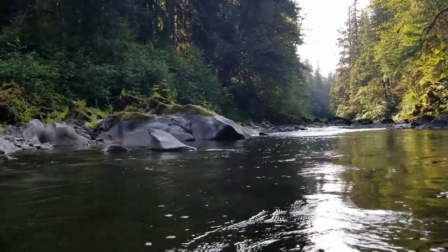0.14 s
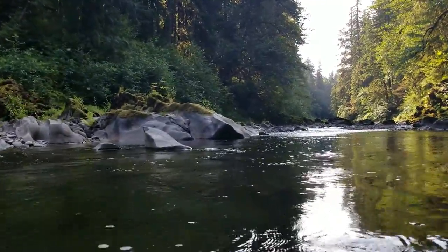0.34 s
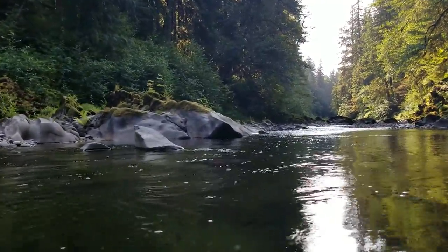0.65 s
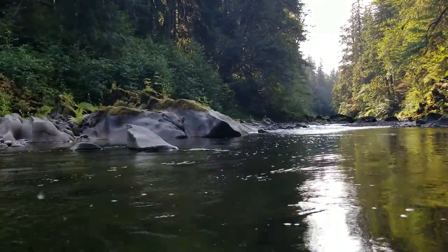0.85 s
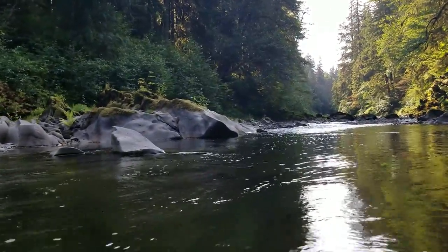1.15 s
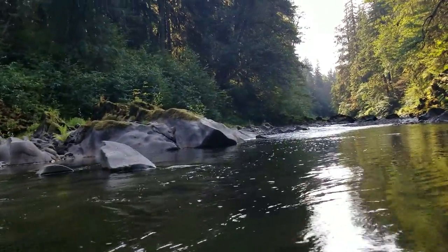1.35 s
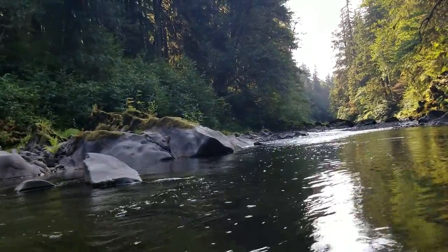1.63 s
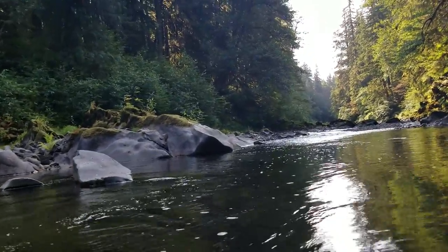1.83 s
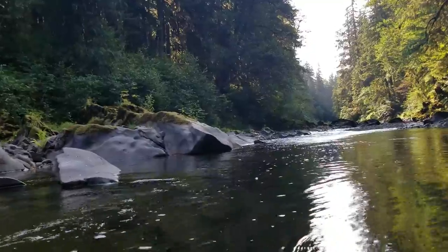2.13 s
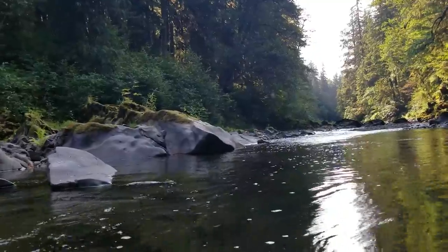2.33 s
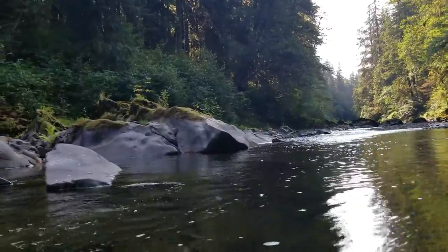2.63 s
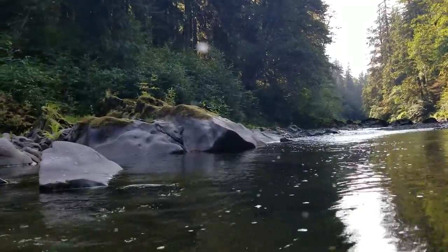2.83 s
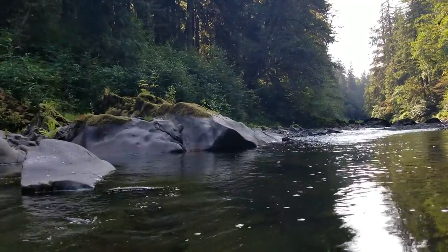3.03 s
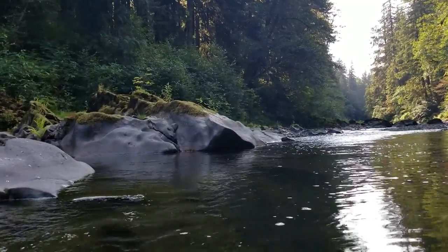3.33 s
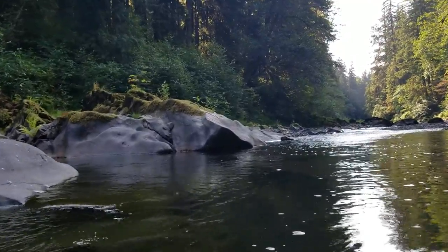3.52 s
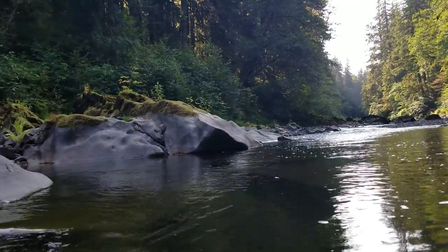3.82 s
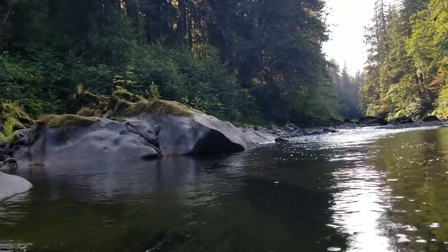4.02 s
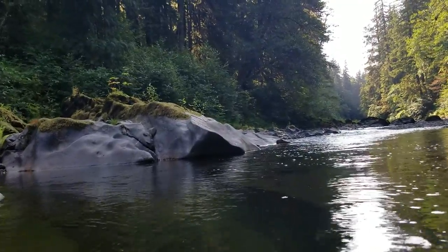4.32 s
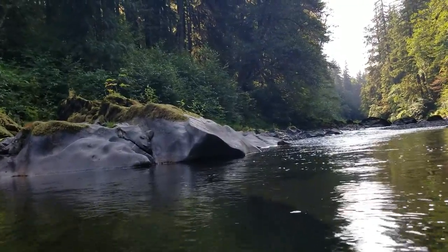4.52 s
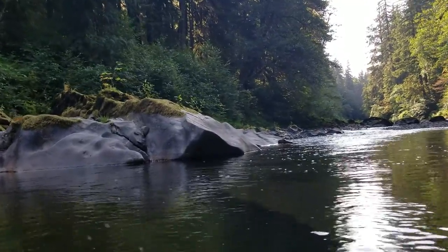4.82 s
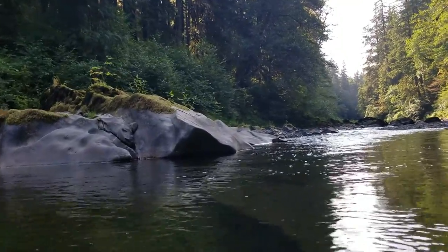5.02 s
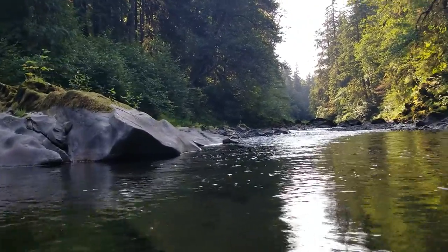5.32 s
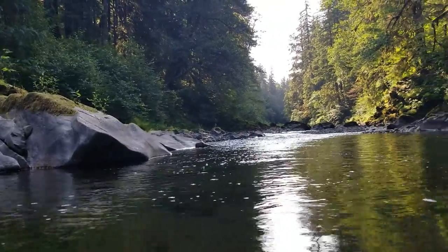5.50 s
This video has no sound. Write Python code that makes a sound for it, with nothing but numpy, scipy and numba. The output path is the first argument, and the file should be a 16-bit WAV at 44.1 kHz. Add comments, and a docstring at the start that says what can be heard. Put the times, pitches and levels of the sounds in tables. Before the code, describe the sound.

Close stereo sound from a small boat on a river: water swirls and bubbles around a paddle, and the second stroke begins with a single sharp knock on the hull. After a brief lull, the strokes carry on with light drips and spray, the last one deepest and splashiest. Far rapids hiss softly and evenly all around throughout.

```python
"""Water gurgles and swishes round a paddle while far rapids hiss on all sides.
A small boat moves along a river, one stroke a second on alternate sides. Each blade drags air
under, which rings as bubbles, and throws spray. Drops and sheets of water fall back, and the
shaft knocks the hull once. Two microphones a hand apart hear it all."""
import sys
import numpy as np
from scipy import signal
from scipy.fft import rfft, irfft, next_fast_len
from scipy.io import wavfile
from scipy.ndimage import uniform_filter1d, map_coordinates
from numba import njit

SR = 44100
rng = np.random.default_rng(int(sys.argv[2]) if len(sys.argv) > 2 else 0)


def store_pcm(level_fs):
    """Save levels as 16-bit WAV."""
    pcm = np.round(np.clip(level_fs, -1, 1) * 32767).astype(np.int16)
    wavfile.write(sys.argv[1], SR, np.atleast_2d(pcm).T)


N = 249606
TOP_HZ = 16990  # highest pitch let through
SIDES = np.array([[.5], [-.5]])  # splits a difference between left and right

# Paddle strokes; lag is how much later the left microphone hears the blade:
# start_s, first_lag_ms, last_lag_ms, extra_glug_db, extra_spray_db, left_over_right_db
STROKES = [(0, 0.05, 0.12, 3, 0.5, 1.2), (1.008, -0.36, -0.22, 0, 1.5, -1.5),
           (1.9, 0.54, 0.018, 2, 4.5, 0.5), (3.001, -0.36, -0.14, 1.5, 1, 0),
           (4.082, 0.48, 0.083, -1.5, 3, 0.5), (5.06, -.3, -0.17, 12, -8, 1)]


def amp(db):
    """Turns decibels into a gain."""
    return 10 ** (np.asarray(db) / 20)


def unit(x):
    """Scales a signal to an average power of 1."""
    return x / np.sqrt(np.mean(x ** 2) + 1e-20)


def along(points, hz):
    """Reads between (pitch_hz, value) points on a log pitch scale."""
    pitches, values = np.transpose(points)
    return np.interp(np.log(hz + 1), np.log(pitches + 1), values)


def curves(rows):
    """One value per sample for each column after the time."""
    time_s, *columns = np.transpose(rows)
    return [np.interp(np.arange(N) / SR, time_s, column) for column in columns]


def filtered(x, response):
    """Gives each pitch in x the gain response(hz)."""
    size = next_fast_len(N + 8192)
    return irfft(rfft(x, size) * response(np.fft.rfftfreq(size, 1 / SR)), size)[..., :N]


def wobble(rate):
    """A smooth curve through `rate` random values a second."""
    return map_coordinates(rng.standard_normal(int(N * rate / SR) + 4), [np.arange(N) * rate / SR])


def patchy_noise(depth_db, channels=1):
    """White noise with louder and softer patches in time and pitch."""
    grid = signal.stft(rng.standard_normal((channels, N)), nperseg=256)[2]
    patches = uniform_filter1d(rng.standard_normal(grid.shape[1:]), size=4, axis=0)
    patches = uniform_filter1d(patches, size=5, axis=1)
    return signal.istft(grid * amp(depth_db * unit(patches)), nperseg=256)[1][:, :N]


def blade_lag_ms(time_s):
    """The blade sweeps back, so its delay between the microphones slides through each stroke."""
    start_s, first_ms, last_ms = np.transpose(STROKES)[:3]
    k = np.clip(np.searchsorted(start_s, time_s, side="right") - 1, 0, None)
    progress = (time_s - start_s[k]) / np.diff(np.append(start_s, N / SR))[k]
    return first_ms[k] + np.sqrt(np.abs(progress)) * (last_ms[k] - first_ms[k])


def stroke_character():
    """Each stroke's extra glug, spray and lean to the left in dB, blended over one second."""
    start_s, *_, glug_db, spray_db, lean_db = np.transpose(STROKES)
    k = np.clip(np.searchsorted(start_s, np.arange(N) / SR) - 1, 0, None)
    return uniform_filter1d(np.array([glug_db[k], spray_db[k], lean_db[k]]), size=SR, axis=1)


@njit
def add_bubbles(out, start_s, life_s, hz, rise, gain, attack, fade):
    """Each bubble is a fading sine that glides `rise` octaves per life as it nears the surface."""
    for mic in range(2):
        for k in range(len(hz)):
            first = int(start_s[mic, k] * SR) + 1
            slope = rise[k] * np.log(2) / life_s[k] + 1e-3
            for i in range(max(first, 0), min(first + int(2 * life_s[k] * SR), out.shape[1])):
                t = i / SR - start_s[mic, k]
                age = t / life_s[k]
                shape = (1 - np.exp(-age / attack)) * np.exp(-fade * age * age)
                phase = 2 * np.pi * hz[k] * (np.exp(slope * t) - 1) / slope
                out[mic, i] += gain[mic, k] * shape * np.sin(phase)


def bubbles(start_s, life_s, hz, rise, db, lag_ms, attack, fade, pan_db=0):
    """Stereo bubbles, later on the left by lag_ms and louder there by pan_db."""
    out = np.zeros((2, N))
    arrival_s = start_s + SIDES * lag_ms / 1000
    add_bubbles(out, arrival_s, life_s, hz, rise, amp(db + SIDES * pan_db), attack, fade)
    return out


def froth(tone, count, cycles, rise, spread_db, scatter_ms, hiss_db, patchy_db=2):
    """A swarm of random bubbles round the blade, over the hiss of those too small to tell apart."""
    when, pitch, size, span, place = rng.random((count, 5)).T
    start_s = when * N / SR
    low_hz, high_hz = tone[1][0], min(tone[-2][0], TOP_HZ)
    hz = low_hz * (high_hz / low_hz) ** pitch
    db = along(tone, hz) + 20 * np.log10(hz) - spread_db * np.log(1 - .97 * size)  # few are loud
    life_s = cycles * (.4 + 1.2 * span) / hz
    lag_ms = blade_lag_ms(start_s) + scatter_ms * (2 * place - 1)
    swarm = bubbles(start_s, life_s, hz, rise * span ** 3, db, lag_ms,
                    attack=.1, fade=2, pan_db=-5 * lag_ms)
    near, around = patchy_noise(patchy_db)[0], patchy_noise(patchy_db, channels=2)
    samples = np.arange(N)
    lag_samples = blade_lag_ms(samples / SR) * SR / 1000
    direct = np.array([map_coordinates(near, [samples - side * lag_samples]) for side in SIDES])
    scatter = lambda f: .45 + f / 7000  # banks and hull scatter the treble most
    hiss = direct + filtered(around, scatter)
    hiss = filtered(hiss, lambda f: amp(along(tone, f)) / np.hypot(1, scatter(f)))
    return unit(unit(swarm) + amp(hiss_db) * unit(hiss))


def paddle():
    """The blade stirs up four sizes of froth: the smaller the bubbles, the higher they ring."""
    # How loud the stirred water is: time_s, gurgle_db, swish_db
    stirring = [(0, -41, -46.5), (0.3, -39.5, -42.5), (0.45, -41.5, -41.5), (0.6, -43, -37),
                (0.85, -39.5, -43.5), (0.97, -49.5, -42.5), (1.12, -30.5, -45.5), (1.32, -50.5, -50),
                (1.6, -51, -50.5), (1.9, -60.5, -57.5), (2.3, -43.5, -54.5), (2.55, -39.5, -49.5),
                (2.9, -51, -49.5), (3.28, -46, -49), (3.36, -40, -40.5), (3.55, -40.5, -37.5),
                (3.72, -38, -39), (3.84, -37.5, -36), (3.95, -39.5, -46.5), (4.35, -41.5, -49.5),
                (4.8, -38, -46.5), (5.0, -41.5, -40.5), (5.33, -37, -32), (5.66, -47.5, -40)]
    # The tone of each froth, from big bubbles to tiny ones: pitch_hz, level_db
    glug_tone = [(47, -11), (80, -12), (130, -14), (275, -4.5), (388, -4), (500, -4), (650, -15),
                 (1100, -120)]
    gurgle_tone = [(180, -55), (300, -18.5), (538, -11), (599, -9), (843, -5.5), (1800, -16.5),
                   (2200, -18.5), (2860, -23), (4840, -120)]
    swish_tone = [(820, -12), (1400, 6), (2150, 1), (2900, 4), (3890, 4), (4800, 2.5), (5980, -13.5),
                  (8000, -15), (10400, -120)]
    spray_tone = [(3240, -4.5), (5500, 5), (5960, -1), (9440, -16), (11900, -3.5), (16000, -8)]
    gurgle = froth(gurgle_tone, count=2000, cycles=12, rise=.3, spread_db=3, scatter_ms=.13, hiss_db=-5)
    glug = froth(glug_tone, count=500, cycles=6, rise=.25, spread_db=2.5, scatter_ms=.1, hiss_db=-1)
    swish = froth(swish_tone, count=4000, cycles=12, rise=.15, spread_db=2.2, scatter_ms=.13, hiss_db=0)
    spray = froth(spray_tone, count=500, cycles=3, rise=0, spread_db=3.5, scatter_ms=.15, hiss_db=9.5,
                  patchy_db=1.5)
    gurgle_db, swish_db = curves(stirring)
    extra_glug_db, extra_spray_db, _ = stroke_character()
    usual_db = -40
    glug_db = -48.5 + 0.61 * (gurgle_db - usual_db) + extra_glug_db
    spray_db = -45 + (swish_db - usual_db) + extra_spray_db
    clumps_db = 1.7 * wobble(40) + 1.1 * wobble(160)  # water leaves the blade in clumps
    body, sheet, mist = splashes()
    # Stirring and splashes add as powers; amp(2 * db) is a power.
    return (np.sqrt(amp(2 * gurgle_db) + body) * gurgle
            + np.sqrt(amp(2 * glug_db) + 0.077 * body) * glug
            + np.sqrt(amp(2 * (swish_db + clumps_db)) + sheet) * swish
            + np.sqrt(amp(2 * (spray_db + 1.45 * clumps_db)) + mist) * spray)


def rapids():
    """Far white water hisses, nearly alike on both sides in the bass, unrelated in the treble."""
    # The tone of the hiss: pitch_hz, level_db
    tone = [(15, -50), (25, 12), (503, 14), (775, 14.5), (1020, 17.5), (1840, 12), (4490, 6), (7710, -3.5),
            (8830, -72), (13200, -28), (16000, -24)]
    # How alike left and right are: pitch_hz, likeness (1 = the same)
    likeness = [(100, 0.79), (500, 1), (1500, 0.017)]

    def response(hz):
        angle = np.arccos(np.clip(along(likeness, hz), -1, 1)) / 2
        return amp(along(tone, hz)) * [np.cos(angle), np.sin(angle)]

    middle, side = filtered(patchy_noise(1.0, channels=2), response)
    return amp(-54) * unit(np.array([middle + side, middle - side]))


def plinks_near_blade():
    """Notes ring near the blade: pockets of air it drags under and drops landing close by; most of them rise."""
    # Notes near the blade: start_s, life_ms, pitch_hz, rise_octaves, level_db
    pockets = [(0.104, 26, 790, 0.094, -31.5), (0.252, 17, 654, 0.33, -23),
               (0.268, 8.9, 1270, -0.073, -19.5), (0.274, 95, 408, 0.79, -31), (0.278, 8.7, 887, 0.2, -16),
               (0.526, 90, 348, 0.71, -30.5), (0.567, 11, 818, 0.069, -18.5),
               (0.606, 7.5, 1310, -0.022, -20.5), (0.663, 7.7, 910, -0.13, -22),
               (0.762, 21, 506, 0.13, -25.5), (0.79, 58, 611, 1, -32), (0.815, 20.5, 942, 0.64, -29.5),
               (0.947, 48, 770, 0.97, -35.5), (1.115, 22, 428, -0.0057, -27.5),
               (1.136, 9.5, 520, -0.1, -19), (1.147, 37, 419, 0.65, -25.5), (1.149, 4.9, 786, -0.12, -18.5),
               (2.021, 4.3, 1900, 0.039, -33.5), (2.241, 43, 223, 0.15, -42), (2.298, 9.3, 1470, -0.1, -30),
               (2.499, 5.7, 900, 0.29, -26.5), (2.505, 91, 330, 1.24, -35), (2.514, 3, 2270, -0.15, -20.5),
               (2.518, 23, 474, 0.94, -31.5), (2.553, 14, 1440, -0.034, -32),
               (2.607, 6.7, 1960, 0.083, -28.5), (2.616, 8.3, 975, 0.088, -28), (2.765, 71, 443, 0.62, -39),
               (3.341, 6.6, 790, 0.14, -29), (3.519, 26, 264, 0.1, -33.5), (3.522, 13, 942, -0.016, -23),
               (3.607, 17, 551, -0.071, -20.5), (3.787, 10, 300, 0.14, -33.5),
               (3.794, 8.6, 900, 0.25, -25.5), (3.846, 15.6, 466, 0.24, -29.5),
               (3.982, 16, 1133, 0.038, -26), (4.096, 18, 435, -0.099, -29), (4.121, 7.3, 804, 0.025, -17),
               (4.123, 7, 1455, 0.65, -17), (4.252, 4.9, 2570, 0.24, -33), (4.5082, 3.2, 3160, 0.2, -26),
               (4.557, 8.6, 1190, 0.043, -24), (4.636, 8, 1030, 0.11, -30.5), (4.708, 7, 740, -0.15, -25),
               (4.745, 3, 4310, 0.1, -29), (4.793, 8, 3660, -0.11, -27), (4.818, 6, 980, 0.13, -20.5),
               (4.832, 7.5, 1200, -0.036, -25), (4.844, 63, 276, 0.33, -30), (4.9, 45, 616, 1.4, -31),
               (5.001, 105, 133, 0.069, -38), (5.044, 12, 965, 0.026, -26.5),
               (5.111, 49, 487, -0.00085, -30.5), (5.17, 31, 134, 0.2, -26.5), (5.211, 9.9, 215, 0.28, -18),
               (5.223, 8.8, 900, 0.48, -21), (5.226, 11, 230, 0.19, -19), (5.245, 14.6, 295, 0.16, -18.5),
               (5.376, 8.2, 226, 0.26, -15.5), (5.39, 24.6, 248, 0.36, -18.5)]
    start_s, life_ms, hz, rise, db = np.transpose(pockets)
    notes = bubbles(start_s, life_ms / 1000, hz, rise, db, blade_lag_ms(start_s), attack=.07, fade=1.5)
    return notes * amp(1.8 * wobble(200))  # the churning water shakes each note


def drops():
    """Each drop hits the water with a crack, then the small hollow it makes rings briefly."""
    # Falling drops: start_s, ring_db, pitch_hz, ring_ms, crack_db
    falls = [(0.161, -43, 1450, 6, -7.5), (0.3979, -21.5, 7000, 3, -7.5), (0.4355, -28.5, 7150, 4, -17),
             (0.63, -15, 4640, 3.8, -18), (0.6772, -20, 4090, 9.5, -34), (0.736, -17.5, 4160, 4.3, -23),
             (0.786, -19.5, 4800, 4.6, -14), (0.9632, -19, 5540, 1.1, -3.5), (1.0075, -33, 4020, 3.3, -29),
             (1.1358, -15.5, 1260, 4, -29), (1.157, -40, 5100, 4, -21), (1.1694, -8, 1570, 9.1, -25),
             (1.285, -23.5, 2750, 2.1, -13), (1.3988, -29, 3420, 4, -22.5), (1.6185, -20, 4200, 2.4, -25),
             (1.67, -24.5, 4300, 2.7, -28), (2.7334, -10.5, 3120, 1.6, -18), (2.7373, -9.5, 4810, 2.4, -8),
             (2.796, -30, 5760, 3, -13.5), (2.936, -29, 5570, 3.4, -19), (3.082, -9.5, 3300, 2, -5),
             (3.139, -24.5, 5100, 4, -20.5), (3.208, -28.5, 3060, 3.9, -22), (3.311, -28.5, 3650, 8.4, -45),
             (3.361, -21.5, 3750, 7.8, -18), (3.393, -24, 4500, 4, -11), (3.442, -24, 3700, 4, -21),
             (3.5183, -18.5, 4100, 5.4, 0.5), (3.5976, -29, 1600, 6, -9.5), (3.678, -23, 4230, 3, -16),
             (4.816, -29.5, 7000, 4.2, -14), (4.952, -18, 2300, 7.4, -37), (4.981, -24, 2200, 8.5, -41),
             (4.9982, -27.5, 2250, 11, -17), (5.0876, -4.5, 1500, 3.6, -10), (5.209, -22, 4250, 3, -22),
             (5.2137, -6, 3500, 2.5, -10)]
    # The notes of a hollow: pitch_multiple, level_db
    hollow_notes = [(1, 0), (1.5, -19.5)]
    start_s, ring_db, hz, ring_ms, crack_db = np.transpose(falls)
    lag_ms = -0.307  # drops land on the left
    rise_octaves = np.full(len(falls), 0.21)
    ring = sum(bubbles(start_s, ring_ms / 1000, multiple * hz, rise_octaves, ring_db + note_db, lag_ms,
                       attack=0.026, fade=4.3) for multiple, note_db in hollow_notes)
    ring *= amp(1.5 * np.array([wobble(1500), wobble(1500)]))  # ripples roughen the ring
    cracks, t = np.zeros((2, N + SR)), np.arange(600) / SR
    for hit_s, db in zip(start_s - .0002, crack_db):
        shape = amp(db - 60 * t / 0.0074) * (1 - np.exp(-t / 0.00063))
        puff = shape * rng.standard_normal(len(t))
        for mic, side in enumerate((.5, -.5)):
            cracks[mic, round((hit_s + side * lag_ms / 1000) * SR):][:len(t)] += puff
    # The tone of a crack: pitch_hz, level_db
    crack_tone = [(500, -53), (3000, -11), (6500, -2.5), (9500, -11.5), (13000, -5.0)]
    return ring + filtered(cracks[:, :N], lambda f: amp(along(crack_tone, f)))


def splashes():
    """Sheets of water land: the power they add to the low, middle and high froth swells, then dies."""
    # Landings: peak_s, level_db, rise_ms (to climb 25 dB), fade_ms (to fall 60 dB),
    # extra_spray_db, extra_body_db
    landings = [(0.273, -39, 120, 250, -24, 12), (0.58, -40.5, 280, 490, -19, 11.5),
                (0.763, -34, 2.1, 130, -14, 5.5), (1.0134, -16.5, 0.4, 160, -10.5, 3),
                (1.077, -17.5, 102, 107, -15, -5.5), (2.02, -39, 3.8, 110, -12, 0),
                (2.499, -38.5, 1, 36, -22, 7), (3.342, -37, 2.6, 71, -15, 0.5),
                (3.608, -40.5, 40, 97, 4, 13.5), (4.12, -32.5, 7.2, 330, -9, -4),
                (4.5, -41, 140, 550, -27, 4), (4.772, -33.5, 42, 250, -10, -0.5),
                (5.087, -27.5, 1.8, 230, -6, -6.5), (5.177, -16.5, 22.5, 19, -3.5, -3.5),
                (5.222, -23.5, 25, 64, -7, 5.5), (5.377, -19, 24, 34, -2.5, -2.5),
                (5.387, -15, 11, 36, 0, -7), (5.406, -26.5, 18, 350, -0.5, -6)]
    t, power = np.arange(N) / SR, np.zeros((3, N))
    for peak_s, db, rise_ms, fade_ms, spray_db, body_db in landings:
        after_ms = 1000 * (t - peak_s)
        shape = amp(db + np.where(after_ms < 0, 25 * after_ms / rise_ms, -60 * after_ms / fade_ms))
        power += (amp([[body_db], [0], [spray_db]]) * shape) ** 2
    return power


def hull_knock():
    """The shaft hits the long hull; each microphone hears its notes at its own strengths and phases."""
    # The hull's notes: pitch_hz, level_db, fade_s (to fall 60 dB)
    hull_notes = [(105, -7, 0.076), (255, -5, 0.059), (467, -8, 0.36), (623, -3.5, 0.093), (850, -6, 0.086),
                  (1442, 9, 0.06), (2420, 16, 0.033), (2754, 19, 0.027)]
    start_s, level_db = 1.0132, -15
    out, t = np.zeros((2, N)), np.arange(SR // 4) / SR
    onset = amp(level_db) * (1 - np.exp(-t / 0.001))
    for mic, lag_samples in enumerate((0, 9)):
        ring = sum(amp(db + rng.normal(0, 1.5) - 60 * t / fade_s)
                   * np.sin(2 * np.pi * hz * t + rng.normal(0, hz / 4000))
                   for hz, db, fade_s in hull_notes)
        out[mic, round(start_s * SR) + lag_samples:][:len(t)] = onset * ring
    return out


def scene():
    """The boat's sounds lean a little left or right with the strokes, over the steady rapids."""
    lean = amp(SIDES * stroke_character()[2])
    return lean * (paddle() + plinks_near_blade() + drops() + hull_knock()) + rapids()


def record(dry):
    """The microphones lose the deepest bass; their input squashes loud peaks and cuts the top treble."""
    # The right microphone is muffled in the treble: pitch_hz, left_over_right_db
    balance = [(60, -1.5), (1200, 2), (3300, -0.5), (5500, -0.5), (7200, 16.5), (10000, 13.5), (15000, 5.5)]
    bass_cut = lambda hz: hz ** 2 / (hz ** 2 + 55 ** 2)
    treble_cut = lambda hz: amp(np.interp(hz, [15800, TOP_HZ], [0, -45])) * (hz < TOP_HZ)
    heard = filtered(dry, lambda hz: bass_cut(hz) * amp(SIDES * along(balance, hz)))
    squashed = heard / (1 + np.abs(heard / .95) ** 6) ** (1 / 6)
    return filtered(squashed, treble_cut)


dry = scene()
out = record(dry)
store_pcm(out)
```